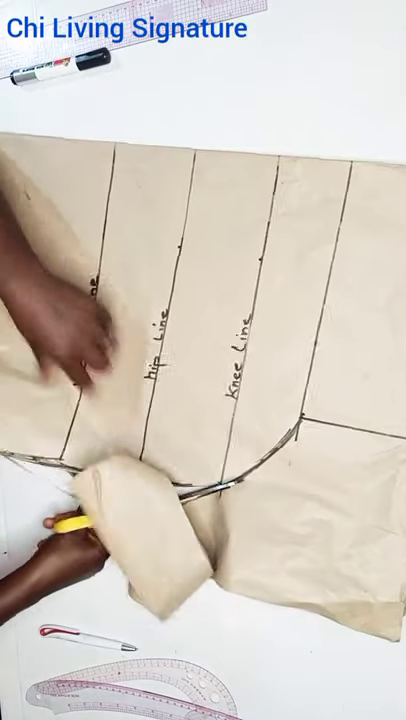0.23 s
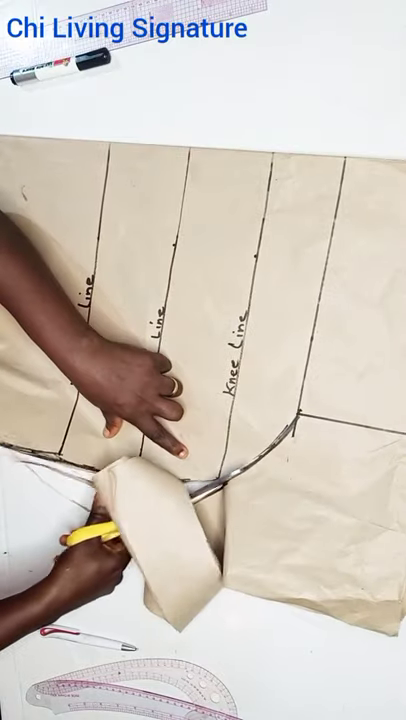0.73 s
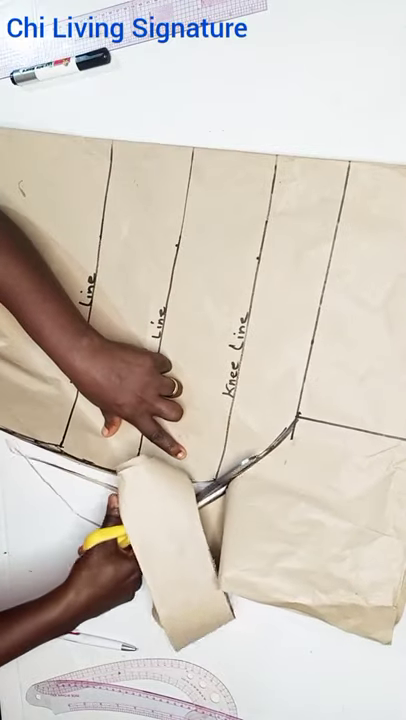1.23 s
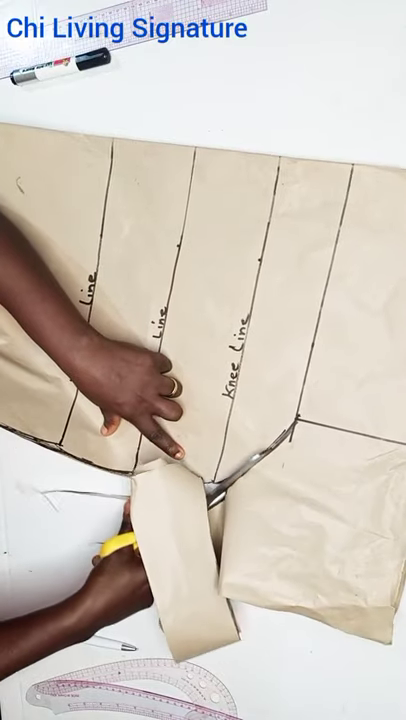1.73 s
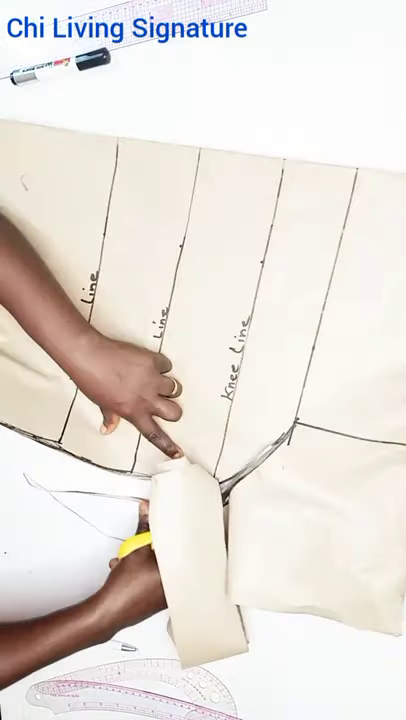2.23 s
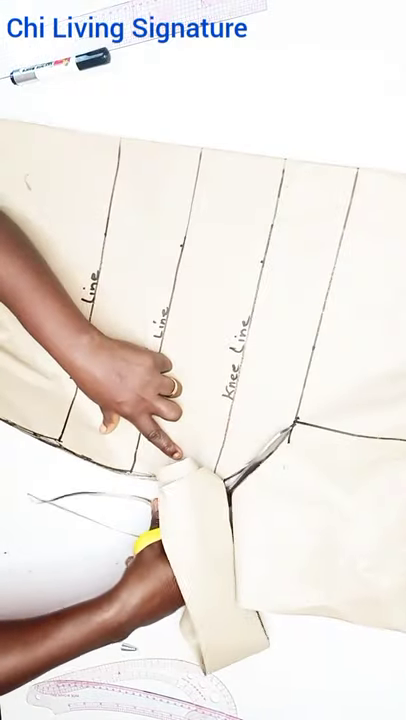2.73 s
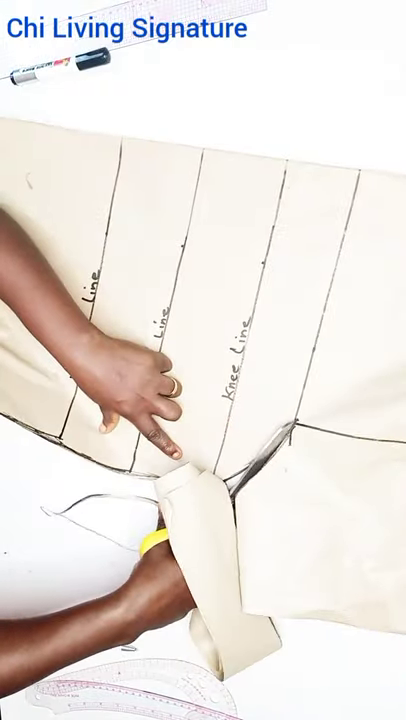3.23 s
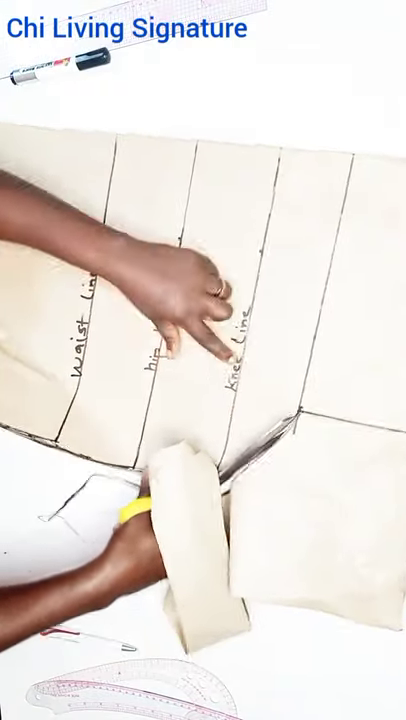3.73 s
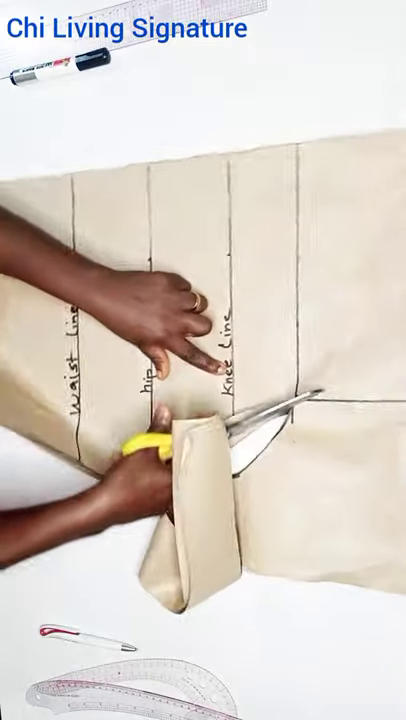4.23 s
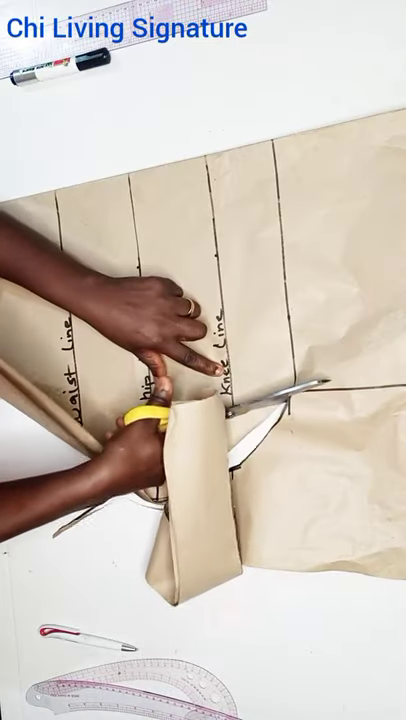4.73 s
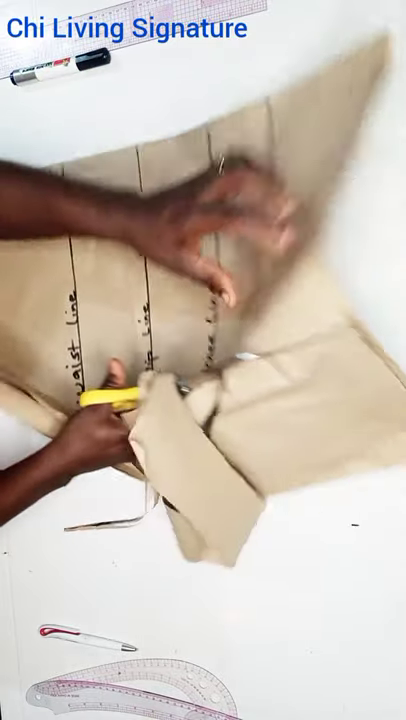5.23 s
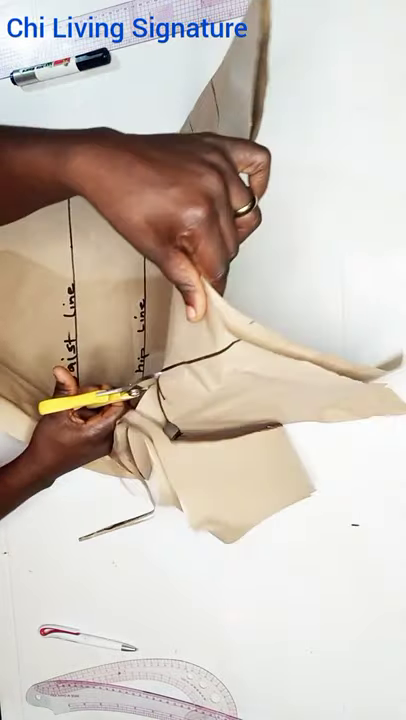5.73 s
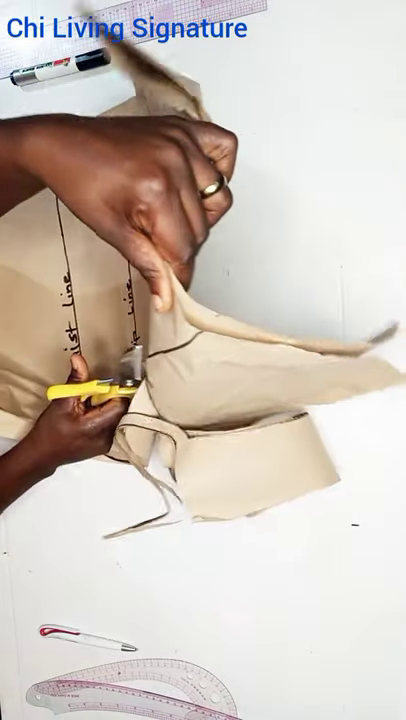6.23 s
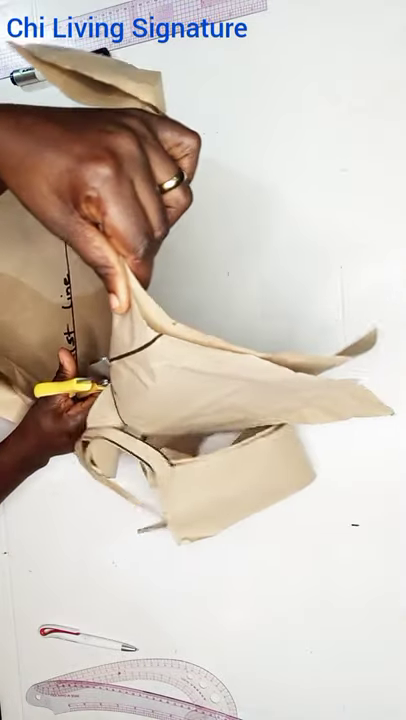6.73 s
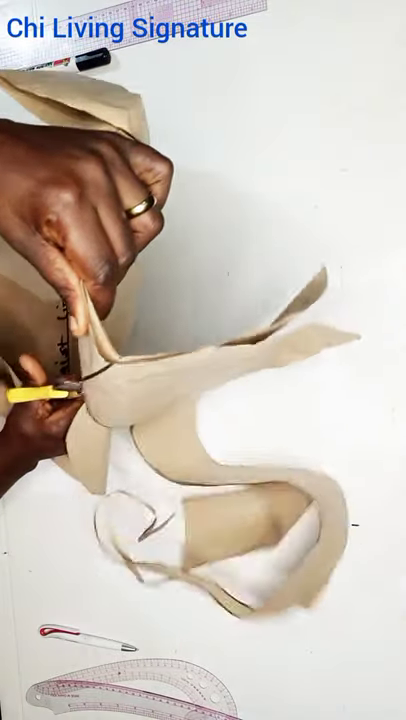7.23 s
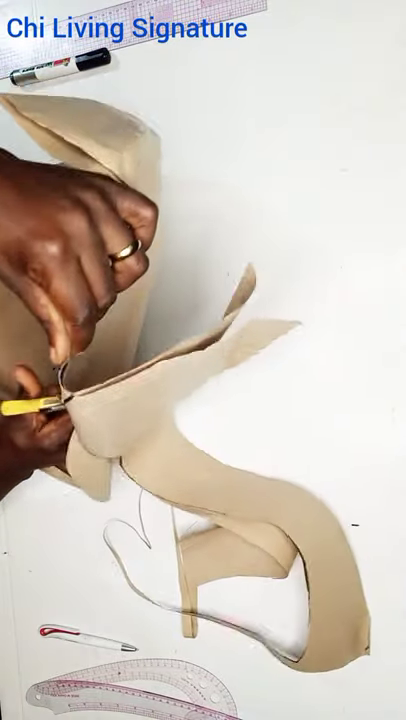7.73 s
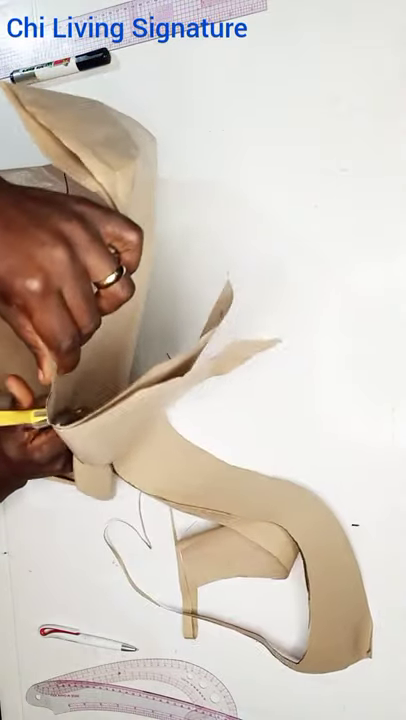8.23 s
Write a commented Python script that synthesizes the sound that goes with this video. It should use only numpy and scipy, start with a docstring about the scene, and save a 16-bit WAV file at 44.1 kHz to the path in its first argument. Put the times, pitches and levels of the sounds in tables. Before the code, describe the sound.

Scissors cut thick paper close to the microphone in a small room. A rasping stroke opens the sound, with sharp clicks around 0.4 and 0.6 seconds. Short, crunchy cuts follow about four or five times a second, each with a crackle of bending paper and often a soft low bump of the blade on the table. At about 3.5 seconds the closing scissors give a dull knock on the tabletop. From roughly 3.8 to 5 seconds the strokes are lighter, with a soft sliding hiss. The sheet is then lifted and handled, rustling and snapping at its creases between 5 and 6 seconds. It quietens briefly, crinkles sharply around 6.8 to 7.2 seconds, and gives a few more short rustles until about 8.5 seconds. A faint low machine hum throbs behind everything.

```python
"""At a table in a small room, scissors cut thick paper close to a phone.
Each stroke tears fibres, bends the sheet and drums the table top; the closing scissors knock on it.
Then the sheet is lifted and crumples in the hand, its creases snapping sharply.
The table top and the room echo the paper. Behind it all, a machine hum throbs faintly."""
import sys
import numpy as np
from scipy import signal
from scipy.fft import rfft, irfft, next_fast_len
from scipy.io import wavfile
from scipy.ndimage import uniform_filter1d, map_coordinates

SR = 44100
rng = np.random.default_rng(int(sys.argv[2]) if len(sys.argv) > 2 else 0)


def log_audio(samples):
    """Write samples as a 16-bit WAV file to the path given in sys.argv[1]."""
    # one column per channel
    frames = np.atleast_2d(samples).T
    # limit to full scale, then quantise
    limited = np.clip(frames, -1, 1)
    pcm = np.round(limited * 32767).astype(np.int16)
    wavfile.write(sys.argv[1], SR, pcm)


N = 374830

# Blade strokes and pulls at the sheet: t/s, length/s, rustle level/dB, hiss level/dB,
# bending level/dB, swell/dB, rustle f/Hz, bending f/Hz
STROKES = [(0.0, 0.051, -43.5, -53, -59, 7, 3940, 820), (0.066, 0.18, -39, -38, -56.5, 9, 4020, 826),
           (0.302, 0.022, -46.5, -59, -59, 0, 3200, 1140), (0.4, 0.023, -39.5, -50, -57, -1.5, 4500, 1330),
           (0.537, 0.082, -42.5, -50, -49, 1, 3550, 950), (0.689, 0.093, -44, -53, -50.5, 4.5, 4230, 745),
           (0.87, 0.11, -52.5, -73, -80, 11, 3000, 885), (0.982, 0.055, -43.5, -53, -34.5, 6, 3400, 620),
           (1.165, 0.079, -53, -53, -52, -0.5, 3720, 680),
           (1.416, 0.071, -50, -51.5, -37.5, 12.5, 3300, 694),
           (1.609, 0.073, -45.5, -47.5, -44, 12.5, 3660, 634),
           (1.824, 0.069, -47.0, -51, -36, 4.5, 3320, 655), (2.022, 0.065, -45, -50.5, -46, 9.5, 3550, 573),
           (2.128, 0.042, -71, -53.5, -87, -2, 3980, 960),
           (2.278, 0.058, -39.5, -45.5, -40.5, 11.5, 3370, 730),
           (2.455, 0.098, -37, -44, -53, 11.5, 4070, 805), (2.685, 0.05, -42, -50, -42, 10.5, 4030, 720),
           (2.874, 0.091, -45.5, -47.5, -78, 9, 5200, 1240), (3.055, 0.059, -40.5, -46, -38, 8, 4000, 705),
           (3.271, 0.013, -56, -59, -48, 25, 5300, 1040), (3.383, 0.1, -39.0, -54, -38, 18.5, 4300, 690),
           (3.585, 0.099, -45.7, -49.5, -52.5, 5.5, 4840, 680),
           (3.753, 0.025, -48, -51.5, -64, 14, 4250, 820), (3.858, 0.36, -48.5, -53.5, -70, -6, 4820, 1090),
           (4.228, 0.081, -53, -62, -71, 1, 3580, 1000), (4.313, 0.055, -45.5, -47, -69, 2, 4390, 820),
           (4.453, 0.1, -56, -53.5, -74, 0, 5500, 910), (4.668, 0.016, -46, -50, -50, 11, 3060, 1290),
           (4.923, 0.024, -44.5, -48, -68, -3, 3830, 1260), (5.033, 0.2, -43.5, -49.5, -42.5, 5, 3770, 990),
           (5.294, 0.13, -51.5, -53, -54.5, -3.5, 4270, 734),
           (5.467, 0.086, -49.5, -52, -59.5, -7.5, 3380, 648),
           (5.586, 0.13, -38.5, -50, -38, 4.5, 3130, 820), (5.815, 0.064, -53.5, -64, -53, 1.5, 3040, 870),
           (5.96, 0.088, -51.5, -55, -65, -10, 3660, 1060), (6.155, 0.099, -52, -51, -55.5, 5, 4000, 800),
           (6.424, 0.021, -66, -55, -67, -10, 2440, 686), (6.56, 0.038, -57.5, -71, -63, 13, 4750, 890),
           (6.82, 0.06, -44.3, -47, -49, -3.5, 3420, 686), (6.904, 0.03, -39.5, -44.5, -54, 12, 4380, 710),
           (7.023, 0.022, -39, -46.5, -47.5, 8, 4310, 910),
           (7.071, 0.095, -35, -39.5, -43.5, 3.5, 4860, 790),
           (7.313, 0.042, -46.5, -47.5, -48.5, 15, 4070, 830),
           (7.427, 0.043, -51.5, -58, -45.5, 11, 3770, 780),
           (7.573, 0.13, -40.5, -45, -52.5, 12.5, 3900, 900), (7.792, 0.026, -39, -43.5, -47, 2, 3930, 900),
           (8.044, 0.13, -41, -44.5, -61.5, 13.5, 4020, 970), (8.262, 0.046, -52, -50, -64, 1, 4000, 940),
           (8.48, 0.03, -49.5, -55, -57, 3.0, 5070, 1020)]
# Soft sliding between strokes: t/s, rustle level/dB, hiss level/dB, bending level/dB
SLIDING = [(0, -56, -56, -70), (.4, -88, -64.5, -87), (1.3, -65, -60.5, -78), (1.95, -72, -68, -83),
           (2.2, -57.5, -59, -73), (3.3, -71, -68, -65), (3.8, -59.5, -58.5, -78), (4.5, -58, -53.5, -75),
           (4.95, -60.5, -56.5, -71), (5.4, -59.5, -53, -65), (6.2, -56.5, -58, -63),
           (6.6, -70, -63, -65.5), (7.4, -59.5, -55, -77), (7.95, -74, -69, -87), (8.3, -70, -65, -60.5),
           (8.5, -77, -76, -82)]
# Tone of the paper's rustle: f/Hz, level/dB
RUSTLE_TONE = [(600, -40), (1200, -7.5), (2300, -1.5), (4500, -1.5), (7000, 0), (9000, -8), (16000, -46)]
# Tone of its fine, high hiss: f/Hz, level/dB
HISS_TONE = [(4000, -37.5), (7500, 6), (10000, -1.5), (16000, -10)]
# Pitches at which the sheet rings: f/Hz, width/Hz, level/dB
SHEET_RINGS = [(430, 130, -3.5), (522, 63, 1.5), (617, 68, -0.5), (694, 138, -2), (953, 280, -0.5),
               (1024, 168, 2.5), (1470, 500, -7)]
# Snapping creases and clicking blades: t/s, level/dB, relative bright level/dB,
# relative hollow level/dB, ring f/Hz, time to fade by 60 dB/s, hollow f/Hz
SNAPS = [(0.181, -31, 5, -25, 6040, 0.08, 713), (0.387, -8, -14.5, -24, 4350, 0.043, 1420),
         (0.5533, -15.5, -10, -15, 2750, 0.082, 1100), (0.5659, -14.5, -15.5, -16, 1880, 0.079, 1040),
         (0.6627, -36.5, 0.5, -1, 2940, 0.047, 1070), (0.6887, -33, -28, -15, 2420, 0.05, 1020),
         (0.7607, -31.5, -9, -2, 6500, 0.054, 530), (0.8083, -28.5, -7, -14, 6500, 0.15, 1490),
         (0.8861, -27, -19, -33, 2160, 0.063, 961), (0.9517, -26.5, -14, -25, 4230, 0.089, 515),
         (1.1473, -33, -11.5, -16, 3170, 0.068, 830), (1.4661, -20.5, -11.5, -12, 2260, 0.066, 530),
         (1.6281, -28, -6, 1, 2940, 0.055, 543), (1.8267, -27, -14, -7, 2250, 0.096, 740),
         (2.032, -28.5, -12, -17, 2710, 0.076, 1050), (2.0696, -23.5, -21, -12, 2800, 0.05, 540),
         (2.2902, -22.5, -14, -24, 2250, 0.042, 748), (2.4848, -16, -12.5, -21, 5750, 0.065, 740),
         (2.5196, -11, -9.5, -35, 3020, 0.027, 1510), (2.6988, -32.5, 1.5, -23, 2200, 0.042, 705),
         (2.7176, -24.5, -6.5, -23, 2900, 0.05, 716), (2.8744, -25, -13, -14.5, 6100, 0.081, 1350),
         (2.9145, -30, -8, -25, 5400, 0.15, 1400), (2.976, -29, -21, -27, 3970, 0.087, 1340),
         (3.0742, -24, -8.5, -3, 6240, 0.09, 633), (3.277, -30, -10.5, -10, 5330, 0.14, 1030),
         (3.3874, -43.5, -4, 15.5, 5330, 0.05, 750), (3.4256, -17, -8, -7, 2190, 0.056, 630),
         (3.4474, -15.5, -8.5, -20, 4970, 0.079, 664), (3.6093, -22, -5.5, -7, 4200, 0.078, 646),
         (3.8667, -30, -16, -23, 3960, 0.05, 1390), (3.9126, -23.5, -12, -28, 5700, 0.15, 1390),
         (4.0153, -29, -4, -30, 4800, 0.042, 1210), (4.0506, -28, -5.5, -24, 4600, 0.15, 940),
         (4.2401, -26.5, -8.5, -31, 3020, 0.078, 1480), (4.3292, -19, -19, -25, 4100, 0.038, 721),
         (4.4776, -30, -10, -27, 6200, 0.04, 842), (4.5421, -34, -11, -28, 6000, 0.072, 1290),
         (4.673, -22.5, -14, -6, 2140, 0.086, 1400), (4.9187, -33.5, 4.5, -19, 3560, 0.058, 1290),
         (5.027, -21, -13, -10, 2300, 0.056, 1420), (5.1152, -15, -11.5, -27, 2480, 0.076, 940),
         (5.17, -24.5, 2, -18, 6000, 0.035, 778), (5.2274, -52, -15, 1, 5980, 0.05, 528),
         (5.2904, -53, -7, -9, 2400, 0.046, 624), (5.3272, -23, -11.5, -29, 3720, 0.076, 519),
         (5.3991, -35, -11, -25, 3700, 0.05, 622), (5.468, -38, -1, -7, 5860, 0.062, 1490),
         (5.51, -29, -20, -14, 2360, 0.046, 506), (5.5934, -17, -25, -10, 2420, 0.023, 610),
         (5.6165, -18.5, -12, -3, 2320, 0.042, 622), (5.6908, -15, -19, -19, 2250, 0.058, 961),
         (5.7402, -24, -27, -21, 4410, 0.11, 1290), (5.882, -30.5, -31, -4, 2260, 0.059, 1020),
         (5.9534, -29, -13, -23, 2430, 0.068, 659), (6.56, -22, -19, -42, 4900, 0.035, 721),
         (6.7989, -27, -10, -19, 2470, 0.071, 715), (6.8451, -15, -4.5, -16, 2330, 0.045, 630),
         (6.9201, -19, -18, -35, 4400, 0.043, 651), (7.045, -24, -16, -22, 4030, 0.057, 926),
         (7.0838, -17.5, -13, -11, 2340, 0.15, 920), (7.0942, -10, -9.5, -28, 6600, 0.03, 870),
         (7.1064, -21, -2, -16, 4300, 0.06, 595), (7.1104, -21.5, -22, -6, 6000, 0.029, 1300),
         (7.1672, -26, -10, -24, 4350, 0.15, 700), (7.3272, -28.5, -8, -32, 4100, 0.13, 912),
         (7.4403, -25, -5, -23, 3900, 0.037, 775), (8.0414, -41, -12, -27, 3880, 0.05, 934),
         (8.4778, -29.5, -7.5, -23, 6760, 0.066, 931)]
# Echoes of the snaps off nearby surfaces: delay/s, level/dB
NEAR_ECHOES = [(.0022, -21), (.0045, -11.5), (.009, -8)]
# The lower blade presses on the table: t/s, deep drumming level/dB, higher drumming level/dB
PRESSES = [(0.028, -39.5, -60), (0.586, -42, -52.5), (0.746, -40, -55), (.87, -53, -70),
           (1.063, -39.5, -47), (1.25, -46, -48), (1.508, -40.5, -38.5), (1.641, -50.5, -47),
           (1.91, -42, -41), (2.076, -43.5, -45.5), (2.352, -44.5, -47), (2.518, -50, -47.5),
           (2.774, -40, -42.5), (2.93, -58, -53), (3.141, -49.5, -46.5), (3.29, -57, -83), (3.41, -53, -54),
           (3.475, -37, -35), (3.53, -37, -47.5), (3.63, -50, -51.5)]
# Pitches at which the table rings, the four deep ones first: f/Hz, width/Hz, level/dB
TABLE_RINGS = [(127, 9.2, 7), (186.4, 11.2, 5), (208.5, 69, -18), (94, 38, -20.5), (293, 12, -6.5),
               (378.5, 7.4, -9)]
# Blows of the closing scissors: t/s, level/dB
KNOCKS = [(3.448, 26.5), (3.46, 23.5)]
# The dull body of a knock: f/Hz, width/Hz, level/dB
THUD = [(330, 370, -14.5)]
# Echo off the table under the paper: t/s, spacing of the peaks it adds to the tone/Hz, level/dB
TABLE_ECHO = [(0, 2530, -4.5), (.36, 2600, -31), (.38, 1360, -14), (.5, 1350, 3.5), (.53, 2830, -18),
              (2, 3030, -16.5), (3.5, 2800, -38.5), (4.2, 2096, -7), (4.9, 3100, -32), (5.3, 2000, -15),
              (5.6, 2090, -14.5), (6.3, 2050, -10), (6.9, 2320, -16), (7.1, 1925, -8.5), (8.5, 2090, -7.5)]
# How long the room rings: f/Hz, time to fade by 60 dB/s
ROOM_FADE = [(300, 0.042), (2000, 0.18), (6000, 0.024), (15000, 0.18)]
# Throbs of the hum, timed where each one drops: t/s, level/dB
THROBS = [(-.25, -60), (.13, -49.5), (.52, -69), (.94, -50), (1.33, -60), (1.72, -61), (2.12, -54),
          (2.5, -56), (2.9, -59), (3.3, -64), (3.68, -67), (4.09, -63.5), (4.44, -61.5), (4.83, -58.5),
          (5.25, -57.5), (5.59, -60.5), (6.01, -57), (6.35, -57.5), (6.73, -54.5), (7.13, -54),
          (7.52, -56.5), (7.91, -54.5), (8.26, -53), (8.63, -53)]
# The machine's two tones: f/Hz, level/dB
HUM_TONES = [(152, 0), (50.7, -19)]
# Tone of the room's background noise: f/Hz, level/dB
AIR_TONE = [(25, -4), (50, -3), (100, 8), (200, 9.5), (500, 1.5), (2000, -3), (16000, -21)]
# Tone of the phone's microphone opening: f/Hz, level/dB
MIC_TONE = [(20, 1.5), (5000, -0.5), (6300, -1.5), (7200, -8), (8100, -13.5), (9000, -4), (10300, 6.5),
            (11800, -1.5), (12600, -10.5), (13400, -8), (14400, -7.5), (15400, 10.5), (16500, -46)]
# The part of the sound that sets left and right apart: f/Hz, level/dB
STEREO_SPREAD = [(3000, -66), (4500, -46.5), (8000, -3.5), (10000, -27), (13000, 4.5), (16000, -16)]


def paper_fibres():
    """Fibres tear and slide: one crackle gives both a rustle and a finer hiss."""
    start, length, rustle_db, hiss_db, _, swell_db, stroke_hz, _ = np.transpose(STROKES)
    centre_hz, = curves(np.transpose([start + length / 2, stroke_hz]))
    soft_rustle, soft_hiss, _ = amp(curves(SLIDING))
    fibres = crackle(per_s=200, spread_db=2.5, life_s=.006, share=.22)
    streaks = lift_band(patchy(fibres, 4.5, bins=3, frames=12), centre_hz, octaves=0.75, lift_db=2.5)
    rustle = unit(filtered(streaks, colour(RUSTLE_TONE)))
    hiss = unit(filtered(patchy(fibres, 3.7, bins=13, frames=13), colour(HISS_TONE)))
    rustle_gain = bursts(start, length, rustle_db, swell_db, rise_db_s=1507, fade_db_s=328)
    hiss_gain = bursts(start, length, hiss_db, 0.37 * swell_db, rise_db_s=1507, fade_db_s=396)
    return np.hypot(rustle_gain, soft_rustle) * rustle + np.hypot(hiss_gain, soft_hiss) * hiss


def sheet_bending():
    """The sheet rings as it bends; in each stroke the pitch falls as the loose flap grows."""
    start, length, _, _, bend_db, swell_db, _, bend_hz = np.transpose(STROKES)
    sag = 2 ** (3.6 * length / 2)  # 3.6 octaves a second
    centre_hz, = curves(sorted([*zip(start, bend_hz * sag), *zip(start + length, bend_hz / sag)]))
    _, _, soft_bend = amp(curves(SLIDING))
    bends = patchy(crackle(per_s=150, spread_db=8, life_s=0.003, share=0.3), 4, bins=2, frames=14)
    ringing = unit(filtered(lift_band(bends, centre_hz, octaves=0.6, lift_db=13), modes(SHEET_RINGS)))
    gain = bursts(start, length, bend_db, swell_db - 2, rise_db_s=637, fade_db_s=384)
    return np.hypot(gain, soft_bend) * ringing


def snaps():
    """A crease or blade creeps for a moment, cracks, then sprays noise that rings at its own pitch."""
    lead = SR // 200
    t = (np.arange(SR // 5) - lead) / SR
    after = t.clip(0, 1)
    parts = np.zeros((3, N + SR))
    for start, db, bright_db, hollow_db, ring_hz, fade_s, hollow_hz in SNAPS:
        fade = 1.71 * amp(-60 * after / 0.0051) + 0.69 * amp(-60 * after / fade_s)
        onset = np.where(t < 0, .3 * amp(60 * t / .012), 1 - .7 * np.exp(-after / .0003))
        noise = rng.standard_normal(len(t))
        spikes = amp(0.95 * rng.standard_normal(len(t) // 20 + 1).repeat(20)[:len(t)])
        burst = amp(db - 7) * fade * onset * noise * spikes
        burst[lead] += amp(db + 5)  # the crack itself
        ring = signal.lfilter(*signal.iirpeak(ring_hz, Q=12, fs=SR), burst)
        pocket = signal.iirpeak(hollow_hz, Q=5.7, fs=SR)
        hollow = signal.lfilter(*pocket, signal.lfilter(*pocket, burst))
        layers = [0.46 * burst + 2.33 * ring, amp(bright_db) * burst, amp(hollow_db) * hollow]
        parts[:, round(start * SR):][:, :len(t)] += layers
    middle, bright, hollow = parts[:, lead:N + lead]
    direct = (amp(1.5) * filtered(patchy(middle, 2.2, bins=2, frames=5), colour(RUSTLE_TONE))
              + amp(8.5) * filtered(bright, colour(HISS_TONE)) + amp(20) * hollow)
    return filtered(direct, lambda hz: 1 + sum(
        amp(db) * np.exp(-2j * np.pi * hz * delay) for delay, db in NEAR_ECHOES))


def table_drumming():
    """The lower blade pushes unevenly on the table; where it presses decides which pitches ring."""
    at, deep_db, higher_db = np.transpose(PRESSES)
    press_s = 0.021
    pushes = crackle(per_s=120, spread_db=4, life_s=0.004, share=0.5)
    deep = unit(filtered(pushes, modes(TABLE_RINGS[:4])))
    higher = unit(filtered(pushes, modes(TABLE_RINGS[4:])))
    deep_gain = bursts(at - press_s / 2, press_s, deep_db, 0, rise_db_s=363, fade_db_s=219)
    higher_gain = bursts(at - 0.023, press_s, higher_db, 0, rise_db_s=363, fade_db_s=352)
    return deep_gain * deep + higher_gain * higher


def table_knocks():
    """The closing scissors hit the table, which thuds and rings."""
    blows = np.zeros(N)
    for at, db in KNOCKS:
        blows[round(at * SR)] = amp(db)
    return filtered(blows, modes(TABLE_RINGS)) - filtered(blows, modes(THUD))


def with_table_echo(x):
    """The sound plus its slightly later copy off the table top."""
    spacing_hz, echo_db = curves(TABLE_ECHO)
    return x + amp(echo_db) * map_coordinates(x, [np.arange(N) - SR / spacing_hz])


def room_echo(x):
    """Each pitch dies away at its own speed; every quarter second gets a fresh echo tail."""
    out, step, delay = np.zeros(N + SR), SR // 4, 200  # step and delay in samples
    for start in range(0, N, step):
        hz, t, spectrum = signal.stft(rng.standard_normal(SR // 2), SR, nperseg=256)
        fade = amp(-60 * t / along(ROOM_FADE, hz)[:, None])
        tail = signal.istft(spectrum * fade, SR, nperseg=256)[1]
        echo = signal.fftconvolve(x[start:start + step], tail / np.linalg.norm(tail))
        out[start + delay:][:len(echo)] += echo[:len(out) - start - delay]
    return out[:N]


def machine_hum():
    """A low hum: each throb swells slowly, holds unsteadily and drops quickly."""
    t = np.arange(N) / SR
    drops, top_db = np.transpose(THROBS)
    count = np.interp(t, drops, np.arange(len(drops)))  # goes up by one per throb
    dip_db = 22 * ((.8 - count % 1) / 0.57).clip(0, 1) ** 1.77
    level = amp(top_db[np.ceil(count).astype(int)] - dip_db)
    swell = uniform_filter1d(uniform_filter1d(level, SR // 25), SR // 25)
    tone = sum(amp(db) * np.sin(2 * np.pi * hz * t) for hz, db in HUM_TONES)
    flutter_hz = 14
    flutter_db = rng.standard_normal(int(N * flutter_hz / SR) + 4)
    flutter = amp(map_coordinates(flutter_db, [t * flutter_hz]))
    return np.sqrt(2) * swell * flutter * tone


def room_air():
    """A faint draught fills the room with low noise."""
    draught = patchy(rng.standard_normal(N), 2.5)
    return amp(-65) * unit(filtered(draught, colour(AIR_TONE)))


def crackle(per_s, spread_db, life_s, share):
    """Tiny noise bursts of uneven size over smooth rubbing noise."""
    starts = (rng.random(N) < per_s / SR) * amp(spread_db * rng.exponential(size=N).clip(0, 4))
    fade = signal.lfilter([1], [1, -np.exp(-1 / (life_s * SR))], starts)
    return (share * unit(fade) + 1 - share) * rng.standard_normal(N)


def bursts(start, length, db, swell_db, rise_db_s, fade_db_s):
    """Loudness curve of events that rise, swell (or sink) while they last, then fade."""
    power, pad = np.zeros(N + 2 * SR), SR // 4
    t = np.arange(-pad, 3 * pad) / SR
    for at, hold, end_db, swell in np.broadcast(start, length, db, swell_db):
        to_come = swell * (1 - t / hold).clip(0, 1) ** 2.75  # most of a swell comes early
        level = end_db + rise_db_s * t.clip(-1, 0) - to_come - fade_db_s * (t - hold).clip(0, 1)
        power[SR + round(at * SR) - pad:][:len(t)] += amp(2 * level)
    return np.sqrt(power[SR:SR + N])


def patchy(x, depth_db, bins=5, frames=5):
    """Make random patches of pitch and time louder or softer, as when the sheet changes shape."""
    spectrum = signal.stft(x, nperseg=512)[2]
    patches = uniform_filter1d(uniform_filter1d(rng.standard_normal(spectrum.shape), bins, 0), frames, 1)
    return signal.istft(spectrum * amp(depth_db * unit(patches)), nperseg=512)[1][:N]


def lift_band(x, centre_hz, octaves, lift_db):
    """Boost a band of pitches that moves with the size of the sheet's loose part."""
    hz, t, spectrum = signal.stft(x, SR, nperseg=512)
    away = np.log2((hz[:, None] + 1) / centre_hz[np.minimum((t * SR).astype(int), N - 1)]) / octaves
    return signal.istft(spectrum * amp(lift_db * np.exp(-away ** 2)), SR, nperseg=512)[1][:N]


def filtered(x, response):
    """Pass x through a filter, given as a function of frequency."""
    size = next_fast_len(N + SR // 2)
    return irfft(rfft(x, size) * response(np.fft.rfftfreq(size, 1 / SR)), size)[..., :N]


def colour(points):
    """A filter that follows (f/Hz, level/dB) points and never sounds ahead of its input."""
    def response(hz):
        cepstrum = irfft(np.log(amp(along(points, hz))))
        cepstrum[1:len(cepstrum) // 2] *= 2
        cepstrum[len(cepstrum) // 2 + 1:] = 0
        return np.exp(rfft(cepstrum))
    return response


def modes(rows):
    """A filter that rings at each (f/Hz, width/Hz, level/dB) row."""
    return lambda f: sum((-1) ** k * amp(db) * 1j * f * width / (hz * hz - f * f + 1j * f * width)
                         for k, (hz, width, db) in enumerate(rows))


def curves(rows):
    """Turn each column after the time into one value per sample."""
    times, *columns = np.transpose(rows)
    return [np.interp(np.arange(N) / SR, times, column) for column in columns]


def along(points, hz):
    """Read between (f/Hz, value) points on a pitch scale."""
    point_hz, values = np.transpose(points)
    return np.interp(np.log(hz + 1), np.log(point_hz + 1), values)


def amp(db):
    """Turn decibels into a gain."""
    return 10 ** (np.asarray(db) / 20)


def unit(x):
    """Scale x to an average power of one."""
    return x / np.sqrt(np.mean(x ** 2) + 1e-20)


def scene():
    """All the sounds meet at one point in front of the phone."""
    cracks = with_table_echo(snaps())
    sheet = with_table_echo(paper_fibres() + sheet_bending())
    air = room_air()
    echo = room_echo(amp(-19) * cracks + amp(-7.5) * sheet)
    mono = cracks + sheet + echo + table_drumming() + table_knocks() + machine_hum() + air
    return np.array([mono, mono])


def record(dry):
    """The microphone opening colours the treble; the treble also differs a little between left and right."""
    mid = filtered(dry[0], colour(MIC_TONE))
    hz, _, spectrum = signal.stft(mid, SR, nperseg=512)
    scrambled = spectrum * np.exp(2j * np.pi * rng.random(spectrum.shape))
    side = signal.istft(scrambled * amp(along(STEREO_SPREAD, hz))[:, None], SR, nperseg=512)[1][:N]
    return filtered(np.array([mid + side, mid - side]), lambda hz: hz < 15900)


dry = scene()
out = record(dry)
log_audio(out)
```